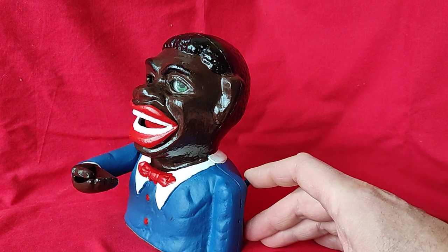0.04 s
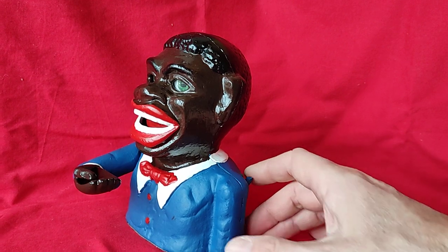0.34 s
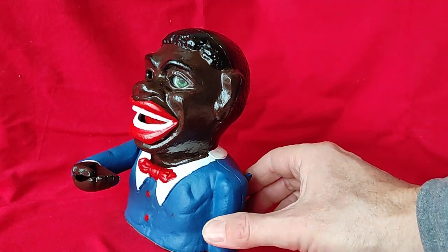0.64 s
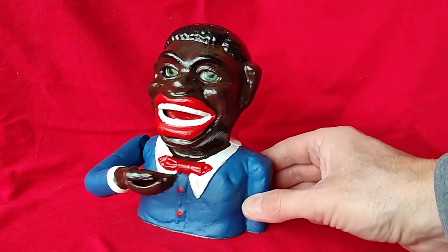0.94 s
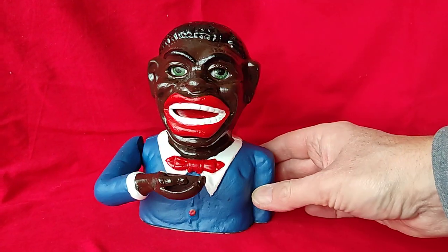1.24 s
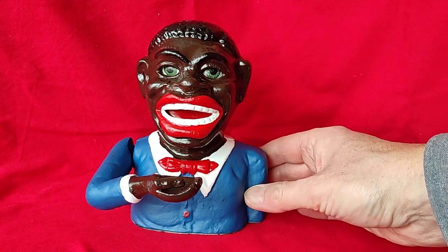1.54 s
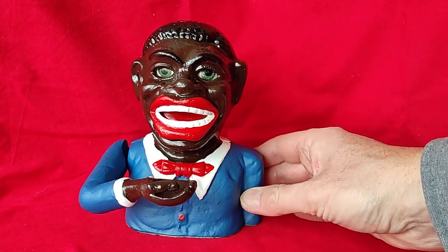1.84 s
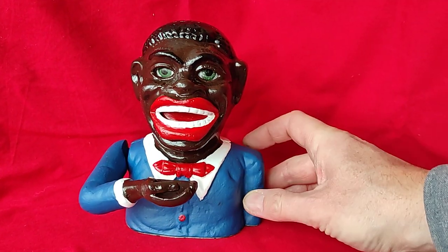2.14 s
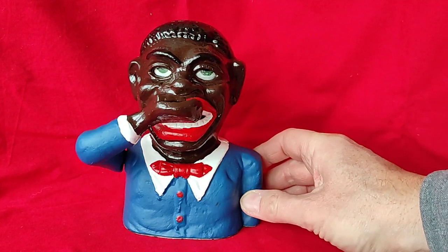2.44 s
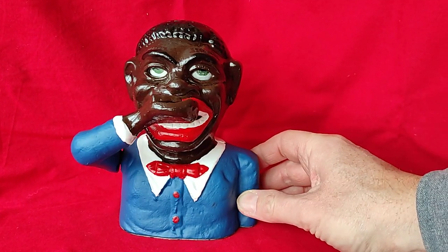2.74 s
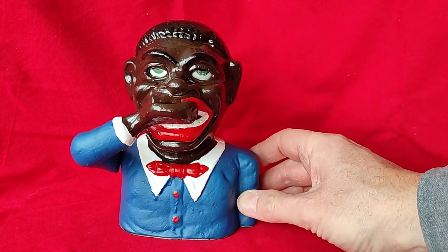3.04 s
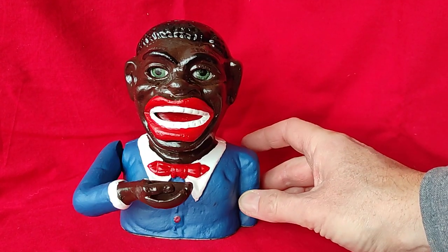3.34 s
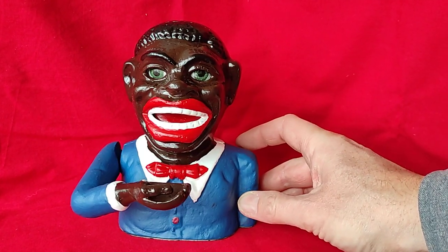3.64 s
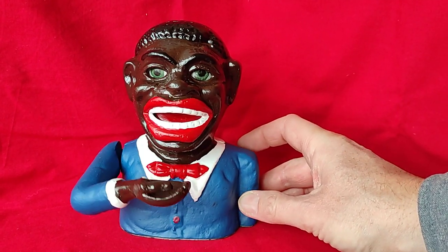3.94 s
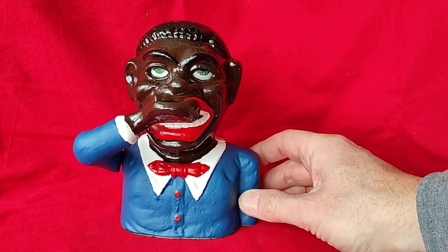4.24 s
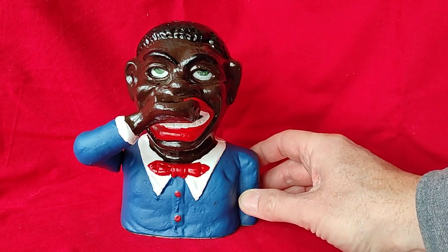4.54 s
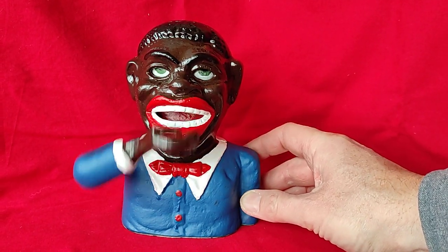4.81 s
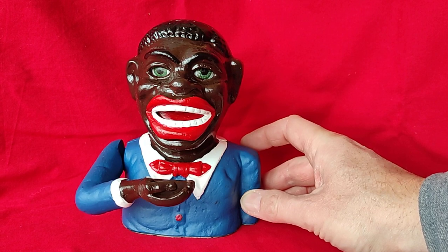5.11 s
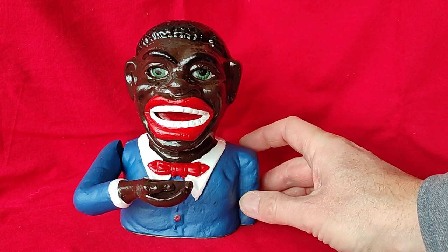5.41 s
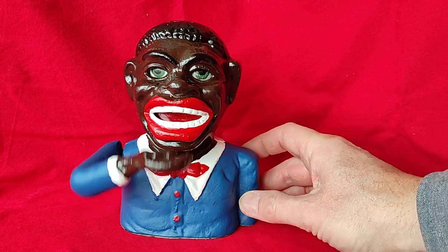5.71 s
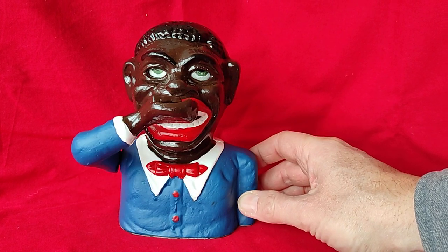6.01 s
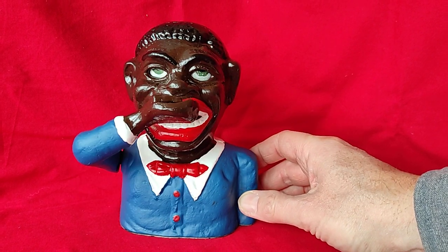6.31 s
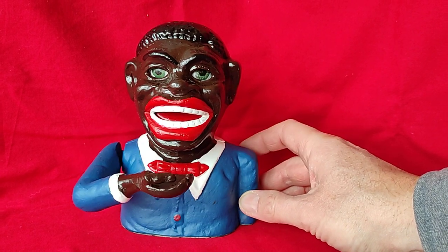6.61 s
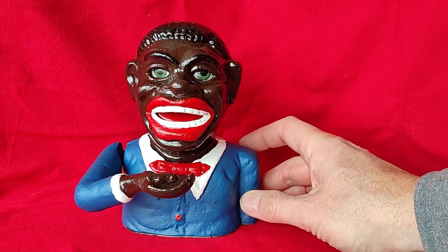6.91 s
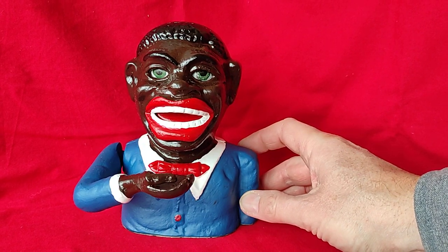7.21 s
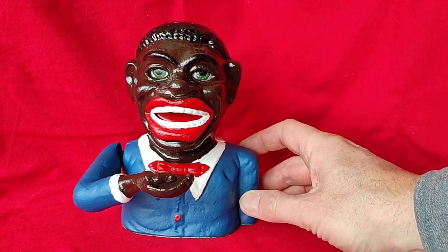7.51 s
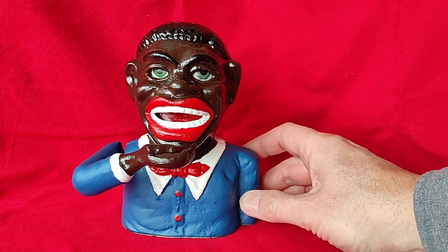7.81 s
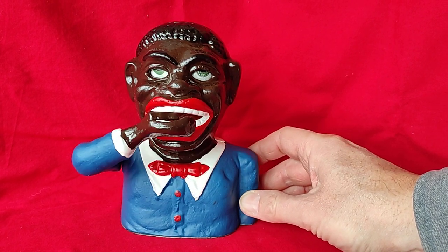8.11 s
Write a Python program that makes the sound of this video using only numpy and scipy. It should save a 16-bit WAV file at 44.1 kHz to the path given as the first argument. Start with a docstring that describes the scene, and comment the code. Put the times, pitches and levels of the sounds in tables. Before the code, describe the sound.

A cast-iron coin bank is handled close by in a small room with a steady low rumble. From about 0.3 to 1.4 seconds it slides faintly on a cloth-covered table with soft bumps and a hollow knock at 1.1 seconds. Its lever is then pressed and released three times, each press preceded by a light click. The arm rises with a sharp metallic clack at about 2.5, 4.2 and 5.9 seconds, and drops with a short scrape, a clack and tiny bounces at about 3.3, 5.0 and 6.6 seconds. Each impact rings briefly, and loose parts knock inside the hollow body. A distant motor hums faintly from around 3.5 seconds and swells once near 7 seconds. Light lever clicks at 7.7 seconds and a small, short creak at 8.1 seconds end the handling.

```python
"""Over the low rumble of a small room, a cast-iron coin bank slides and bumps on a cloth-covered table.
Close by, its lever is then pressed and let go three times: the linkage ticks, dry friction drives the
pivot, and the arm clacks against its stops, each impact exciting the modes of the casting.
Loose parts knock in the hollow inside; light clicks and a creak end the handling.
A distant motor hums faintly from midway and surges once."""
import sys
import numpy as np
from scipy import signal
from scipy.fft import rfft, irfft, next_fast_len
from scipy.io import wavfile
from scipy.ndimage import uniform_filter1d

SR = 44100
rng = np.random.default_rng(int(sys.argv[2]) if len(sys.argv) > 2 else 0)


def unload_wav(signal):
    """Save mono or channel-first audio to the path in sys.argv[1] as 16-bit WAV at rate SR, clipped to [-1, 1]."""
    wavfile.write(
        sys.argv[1],
        SR,
        np.round(np.clip(np.atleast_2d(signal).T, -1, 1) * 32767).astype(np.int16),
    )


N = 364260
TIME = np.arange(N) / SR
RING = np.arange(SR // 4) / SR  # seconds after a blow
ATTACK = round(.007 * SR)  # the first samples of a blow, which set its level
TOP_HZ = 15600


def amp(db):
    """Decibels to amplitude ratio."""
    return 10 ** (np.asarray(db) / 20)


def unit(x, n=None):
    """Normalisation to rms 1, over the first n samples if n is given."""
    return x / np.sqrt(np.mean(x[..., :n] ** 2) + 1e-20)


def along(points, hz):
    """Interpolation on a logarithmic frequency axis."""
    freqs, values = np.transpose(points)
    return np.interp(np.log(hz + 1), np.log(freqs + 1), values)


def filtered(x, response):
    """Linear filtering: the spectrum is multiplied by a frequency response."""
    n = x.shape[-1]
    size = next_fast_len(n + SR // 8)
    return irfft(rfft(x, size) * response(np.fft.rfftfreq(size, 1 / SR)), size)[..., :n]


def low_cut(x, hz):
    """A causal fourth-order high-pass."""
    return signal.sosfilt(signal.butter(4, hz, "high", fs=SR, output="sos"), x)


def noise(spectrum, n, alike):
    """Coloured stereo noise: mid and side mix to the correlation `alike`, a number or a curve."""
    def colour(hz):
        correlation = along(alike, hz) if np.ndim(alike) else alike + 0 * hz
        angle = np.arccos(np.clip(correlation, -1, 1)) / 2
        return amp(along(spectrum, hz)) * [np.cos(angle), np.sin(angle)]
    mid, side = filtered(rng.standard_normal((2, n)), colour)
    return unit(np.array([mid + side, mid - side]))


def fade(t60):
    """Exponential damping: 60 dB lost in t60 seconds."""
    return np.exp(-np.log(1000) * RING / t60)


def mode(hz, t60):
    """The free vibration of a damped oscillator."""
    return np.sin(2 * np.pi * hz * RING) * fade(t60)


def panned(side_db):
    """Amplitude panning: two gains of mean 1, the left side_db above the right."""
    gains = amp(side_db * np.array([[.5], [-.5]]))
    return gains / gains.mean(0)


def add(track, s, sound):
    """Superposition: a sound joins the track at s seconds."""
    start = round(s * SR)
    track[:, start:start + sound.shape[-1]] += sound[..., :N - start]


# Room noise. Each row: frequency in Hz, relative spectral density in dB.
ROOM_SPECTRUM = [(15, -67.5), (25, -46), (63, -2.5), (102, -4), (166, -1), (195, -3.5), (217, -11.5),
                 (285, -11), (317, -12), (354, -12), (677, -23), (962, -24.5), (7310, -43), (12200, -43),
                 (16000, -37.5)]
# Its balance. Each row: frequency in Hz, left over right in dB.
ROOM_BALANCE = [(60, 6.5), (180, 2.5), (550, -1.5), (1650, 0.5), (4970, 1.0), (15000, -0.5)]
# Its width. Each row: frequency in Hz, left-right correlation.
ROOM_CORRELATION = [(60, 0.46), (180, 0.78), (550, 0.36), (1650, -0.24), (4970, -0.11), (15000, -0.76)]

def room_rumble():
    """Stationary noise: a low rumble and faint hiss, partly correlated between left and right."""
    air = noise(ROOM_SPECTRUM, N, ROOM_CORRELATION)
    air = filtered(air, lambda hz: amp(along(ROOM_BALANCE, hz) * [[.5], [-.5]]))
    return amp(-54) * unit(air)


# Reverberation time. Each row: frequency in Hz, t60 in seconds.
WALL_DECAY = [(150, 0.47), (1000, 0.12), (5000, 0.21), (15000, 0.12)]

def reverberation(x):
    """Absorption at the walls varies with frequency: the bass outlasts the treble."""
    hz, t, spectra = signal.stft(rng.standard_normal((2, SR // 2)), SR, nperseg=256)
    decay = np.exp(-np.log(1000) * t / along(WALL_DECAY, hz)[:, None])
    tail = signal.istft(spectra * decay, SR, nperseg=256)[1]
    tail = np.pad(tail, ((0, 0), (SR // 200, 0)))  # reflections start 5 ms late
    return signal.fftconvolve(x, tail / np.linalg.norm(tail[0]), axes=1)[:, :N]


def motor():
    """Forced resonance: a far motor's octave drives a room mode. In a surge, speed lags effort."""
    idle_hz, surge_hz, lag_s = 177, 11, .199
    idle_db, surge_db = -65, 10.5
    on_s, fade_in_s = 3.4, .63
    mode_hz, width_hz, mode_db = 359.8, 13, 2.2
    surge_s = 6.68 + np.cumsum([0, .259, .42, 1.15])  # start, rise, hold, fall
    effort = lambda t: np.interp(t, surge_s, [0, 1, 1, 0])
    pitch = idle_hz + surge_hz * effort(TIME - lag_s)
    level = amp(idle_db + surge_db * effort(TIME)) * np.clip((TIME - on_s) / fade_in_s, 0, 1)
    octave = amp(mode_db) / np.hypot(1, 2 * (2 * pitch - mode_hz) / width_hz)
    phase = 2 * np.pi * np.cumsum(pitch) / SR
    return level * (np.sin(phase) + octave * np.sin(2 * phase))


# Iron on cloth. Each row: frequency in Hz, relative spectral density in dB.
CLOTH_SPECTRUM = [(350, -34), (600, -0.5), (1030, -4), (1800, -7.5), (1980, -11), (5870, -10.5),
                  (7110, -19.5), (12000, -8.5), (16000, -21)]
# Slides of the base. Each row: start in seconds, end in seconds, level in dB.
BASE_SLIDES = [(0.298, 0.61, -73), (0.875, 1.39, -63)]

def cloth_hiss():
    """Sliding friction on the weave makes a hiss that builds, sags and dies as the bank is turned."""
    rise, sag, stop = 118, 8.5, 75  # dB per second
    level = 0
    for start, end, db in BASE_SLIDES:
        before, since, after = np.maximum([start - TIME, TIME - start, TIME - end], 0)
        level = level + amp(db - rise * before - sag * since - stop * after)
    return level * noise(CLOTH_SPECTRUM, N, alike=.4)


def bump(db, hz, t60):
    """A cushioned impact: the cloth softens the blow to a few slow cycles of the table."""
    thud = mode(hz, t60) * (1 - np.exp(-(RING / .005) ** 2))
    return amp(db) * thud / np.abs(thud).max()


# Bumps of the base. Each row: start in seconds, peak in dB, pitch in Hz, t60 in seconds.
BASE_BUMPS = [(.579, -32.5, 132, .015), (.627, -32, 145, .019), (.900, -33, 125, 0.064),
              (1.937, -35.5, 103, 0.033), (3.544, -33.5, 117, 0.037), (4.560, -43, 78.5, 0.059)]

def table_bumps():
    """The base bumps the table; a level difference places the thuds on the left."""
    out = np.zeros((2, N))
    for s, db, hz, t60 in BASE_BUMPS:
        add(out, s, panned(side_db=23) * bump(db, hz, t60))
    return out


# Iron on iron. Each row: frequency in Hz, relative spectral density in dB.
CRACK_SPECTRUM = [(150, -48), (500, -19.5), (1000, 4), (1500, -5.5), (2100, -2.5), (2700, 3.5), (4400, 1.5),
                  (6500, 0.5), (7100, -5.5), (8600, -4.5), (11000, -5), (13500, -7.5), (15500, -13.5)]

def crack(alike, t60):
    """A brief contact has a broad spectrum: a burst of bright noise."""
    return noise(CRACK_SPECTRUM, len(RING), alike) * fade(t60)


# The hollow body. Each row: frequency in Hz, relative spectral density in dB.
BODY_SPECTRUM = [(60, -49.5), (120, -33), (230, -11), (325, 0.5), (420, -7), (550, 1.5), (650, -5.5),
                 (780, -9.5), (1200, -19), (2200, -26), (4000, -81.5)]

def shell(alike, t60):
    """Overlapping low resonances of the body answer a blow like decaying noise."""
    return noise(BODY_SPECTRUM, len(RING), alike) * fade(t60)


def spring(start_hz, end_hz, droop_s, t60):
    """Dispersion: high bending waves in the return spring arrive first, so the twang falls."""
    hz = end_hz + (start_hz - end_hz) / (1 + RING / droop_s)
    return np.sin(2 * np.pi * np.cumsum(hz) / SR) * fade(t60)


# Modes of the hollow inside. Each row: frequency in Hz, relative level in dB, t60 in seconds.
CAVITY_MODES = [(584, -11, 0.056), (643, -14, 0.077), (810.6, -4, .018), (933, 7.5, 0.012),
                (1090, -5.5, 0.012), (1335, -22.5, 0.033), (1760, -14.5, .06)]

def knock(db, hardness):
    """A blunt blow excites damped cavity modes; hardness tilts them upward, in dB per octave."""
    tuning = 1 + .032 * rng.standard_normal()
    ring = sum(amp(level + hardness * np.log2(hz)) * mode(hz * tuning, t60)
               for hz, level, t60 in CAVITY_MODES)
    ring = ring * (1 - np.exp(-(RING / .001) ** 2))
    snap = amp(hardness - 28.5) * crack(alike=.2, t60=.025)
    return amp(db - 2) * (ring / np.abs(ring).max() + snap)


# Modes of the lever. Each row: frequency in Hz, relative level in dB, t60 in seconds.
LEVER_MODES = [(2380, -5, .06), (2787, 2, .075), (3908, -9.5, 0.074), (4490, -6.5, .09), (4640, -6, .1),
               (6110, -9.5, 0.056)]

def lever():
    """Free vibration of the lever's few modes, which stand out in light contacts."""
    tuning = 1 + .006 * rng.standard_normal()
    return unit(sum(amp(db) * mode(hz * tuning, t60) for hz, db, t60 in LEVER_MODES), ATTACK)


# Strong modes of the casting. Each row: frequency in Hz, relative level in dB.
IRON_MODES = [(1775, -5), (2288, -10), (2790, -2), (3000, -3), (3280, 0), (3350, -4), (4145, -1),
              (4270, -4), (4394, 2), (4635, 1), (5425, -1), (5640, -3), (6450, 3), (6600, 2), (7730, -6),
              (8452, -1), (9980, -2), (10930, -2), (12580, -5)]
# Damping of the iron. Each row: frequency in Hz, t60 in seconds.
IRON_T60 = [(1500, 0.16), (3200, 0.098), (4600, .1), (6500, 0.073), (11000, 0.091), (15000, 0.1)]

def casting(weak_count):
    """Normal modes of the casting, one complex decay a row: a few strong among many weak."""
    strong_hz, strong_db = np.transpose(IRON_MODES)
    weak_hz = 1000 + (TOP_HZ - 1000) * (np.arange(weak_count) + rng.random(weak_count)) / weak_count
    hz = np.concatenate([strong_hz, weak_hz])[:, None]
    db = np.concatenate([strong_db, along(CRACK_SPECTRUM, weak_hz) - 9])[:, None]
    t60 = along(IRON_T60, hz) * np.exp(.15 * rng.standard_normal(hz.shape))
    return amp(db) * fade(t60) * np.exp(2j * np.pi * hz * RING)


def struck(modes, alike):
    """Modal superposition: each blow has new weights, left and right, and a slightly new pitch."""
    strength = amp(3 * rng.standard_normal(len(modes)))
    mid, side = strength * np.exp(2j * np.pi * rng.random((2, len(modes))))
    angle = np.arccos(np.clip(alike, 0, 1)) / 2
    weights = np.cos(angle) * mid + np.sin(angle) * np.array([side, -side])
    shift_hz = 18 * rng.standard_normal()
    ring = weights @ modes * np.exp(2j * np.pi * shift_hz * RING)
    return unit(ring.real, ATTACK)


def voiced(metal, treble_db, n):
    """Filtering sets a tick's brightness: duller ticks have less treble and are low-passed lower."""
    edge_hz = np.interp(treble_db, [-35, -18], [4400, 7200])
    low = signal.sosfilt(signal.butter(7, edge_hz, fs=SR, output="sos"), metal)
    high = signal.sosfilt(signal.butter(7, 7200, "high", fs=SR, output="sos"), metal)
    return unit(low, n) + amp(treble_db) * unit(high, n)


def clack(modes, db, treble_db, body_db, lever_db):
    """Impulse response of casting, lever, body and spring; the last three levels are relative to db."""
    snap = amp(3) * crack(alike=.07, t60=.012)
    metal = snap + struck(modes, alike=.075) + amp(lever_db) * lever()
    metal = voiced(metal, treble_db, ATTACK)
    twang = amp(-3.5) * spring(start_hz=1293, end_hz=276, droop_s=.0022, t60=.13)
    body = shell(alike=.67, t60=.12) + twang
    body = body * (1 - np.exp(-RING / .0004))  # the heavy shell takes a moment to move
    return low_cut(amp(db + 1) * metal + amp(db + body_db) * unit(body, ATTACK), hz=149)


# Resonances of the dry pivot. Each row: frequency in Hz, bandwidth in Hz, relative level in dB.
PIVOT_MODES = [(1515, 44, -5), (2767, 51, 0), (2960, 42, 0.5), (4270, 120, -8), (6430, 120, -16.5)]

def rub(modes, length_s, db, treble_db, body_db, chatter_db):
    """Dry friction: tiny random slips keep casting, body and pivot ringing while the arm moves."""
    slips_per_s = 700
    pivot = sum(amp(level) * width * np.exp(-np.pi * width * RING) * np.sin(2 * np.pi * hz * RING)
                for hz, width, level in PIVOT_MODES)
    n = round(length_s * SR)
    strengths = rng.standard_normal((1, len(RING)))[:, :n]
    slips = strengths * (rng.random(len(RING))[:n] < slips_per_s / SR)
    rubbed = lambda response: unit(signal.fftconvolve(slips, response, axes=1), n)
    metal = rubbed(struck(modes, alike=.2) * fade(.087))  # the pressed contact damps the ring
    body = amp(body_db) * rubbed(shell(alike=.8, t60=.036))
    chatter = amp(chatter_db) * rubbed(pivot[None])
    return low_cut(amp(db - 3.5) * (voiced(metal, treble_db, n) + body + chatter), hz=150)


def groan(length_s, db, start_hz, end_hz, rough):
    """Stick-slip oscillation: the loaded pivot slips almost regularly, in a low tone that swells."""
    progress = np.clip(RING / length_s, 0, 1)
    jitter = unit(uniform_filter1d(rng.standard_normal(len(RING)), size=200))
    hz = (start_hz + (end_hz - start_hz) * progress) * (1 + rough * jitter)
    phase = 2 * np.pi * np.cumsum(hz) / SR
    swell = np.sqrt(np.abs(np.sin(np.pi * progress)))
    return amp(db) * swell * (np.sin(phase) + amp(-19) * np.sin(2 * phase))


# Lever clicks. Each row: start in seconds, ring level in dB, treble and body in dB over the ring.
LEVER_CLICKS = [(2.2947, -43.5, -5, 2), (4.0563, -41.5, 3, 0), (5.6472, -46, -4.5, -1.5),
                (7.6984, -45.5, 5, 1.5), (7.728, -50, -11.5, 5.5), (7.844, -60, -24, 8)]
# Jogs of the casting. Each row: start in seconds, ring level in dB, treble and body in dB over the ring.
CASTING_JOGS = [(0.542, -65, -1, -19), (1.1488, -63.5, 6.5, 22), (4.575, -75, -36, 15),
                (8.0793, -68.5, 3.5, 18)]
# Loose parts. Each row: start in seconds, level in dB, hardness in dB per octave.
STRAY_KNOCKS = [(1.1478, -24, 7.5), (2.4404, -25, -3.5)]

def handling(modes):
    """Weak excitation: fingers click the lever and jog the casting; a last, slow lift creaks."""
    out = np.zeros((2, N))
    for s, db, treble_db, body_db in LEVER_CLICKS:
        add(out, s, clack(modes, db, treble_db, body_db, lever_db=1))
    for s, db, treble_db, body_db in CASTING_JOGS:
        add(out, s, clack(modes, db, treble_db, body_db, lever_db=-14))
    for s, db, hardness in STRAY_KNOCKS:
        add(out, s, knock(db, hardness))
    creak = groan(length_s=.069, db=-44.5, start_hz=383.7, end_hz=383.7, rough=.05)
    add(out, 8.105, creak + knock(db=-48, hardness=-4))
    return out


# Contacts in a lift. Each gives: ring level in dB, then treble, body and lever in dB over the ring.
SLACK = (-48.5, -45, 5.5, -1.5)
CATCH = (-38, -.5, -2.5, -7)
TOP_STOP = (-23.5, -9.5, -4.5, -11)
REBOUND = (-36, -3.5, -6.5, -9.5)
SETTLE = (-57.5, -5.5, 2.5, -1)
# Lever presses. Each row: times in seconds of slack taken up, catch, top stop and loose parts landing,
# then force in dB, landing level in dB, landing hardness in dB per octave.
ARM_LIFTS = [(2.3875, 2.4128, 2.4808, 2.497, -.5, -10, 0), (4.105, 4.134, 4.2066, 4.2207, 0, -8.5, -.5),
             (5.7759, 5.798, 5.8668, 5.8797, 1, -5.5, 2.5)]

def lifts(modes):
    """Friction, then impact: the arm rubs up to its stop and rebounds; loose parts land twice."""
    out = np.zeros((2, N))
    for slack_s, catch_s, stop_s, land_s, force_db, land_db, hardness in ARM_LIFTS:
        contacts = [(slack_s, SLACK), (catch_s, CATCH), (stop_s, TOP_STOP),
                    (stop_s + .026, REBOUND), (stop_s + .124, SETTLE)]
        for s, contact in contacts:
            add(out, s, amp(force_db) * clack(modes, *contact))
        swing_s = stop_s - catch_s
        friction = rub(modes, swing_s, db=-46.5, treble_db=-4.5, body_db=6, chatter_db=-8)
        add(out, catch_s, amp(force_db) * friction)
        groan_s = swing_s / 2 + .015
        add(out, stop_s - groan_s, groan(groan_s, force_db - 38.5, start_hz=370, end_hz=288, rough=.06))
        add(out, land_s, knock(land_db, hardness))
        add(out, land_s + .0085, knock(db=-17.5, hardness=-2))
    return out


# Contacts in a fall. Each gives: ring level in dB, then treble, body and lever in dB over the ring.
RELEASE = (-57, -1, 8, -5.5)
SCRAPE_TICK = (-42, -13, -6.5, -1)
GUIDE_TICK = (-41.5, -8, -.5, -6.5)
BOTTOM_STOP = (-23, -4.5, -4, -17)
# Lever releases. Each row: release and landing in seconds, grinding level in dB, landing force in dB,
# first flight in seconds, first bounce level in dB.
ARM_FALLS = [(3.177, 3.2661, -49, 2, .03, -32), (4.859, 4.95, -47.5, 0, .02, -39),
             (6.526, 6.619, -38, -10, .012, -40)]

def falls(modes):
    """Inelastic collision: the arm scrapes down, lands and bounces twice, sooner and softer each time."""
    linkage_lag_s, flight_ratio, bounce_loss_db = .009, .56, 6
    out = np.zeros((2, N))
    for release_s, land_s, grind_db, force_db, flight_s, bounce_db in ARM_FALLS:
        scrape = rub(modes, land_s - release_s, db=-55, treble_db=-10, body_db=4.5, chatter_db=9.5)
        add(out, release_s, scrape)
        ticks = [(release_s, RELEASE), (release_s + .042, SCRAPE_TICK), (land_s - .022, GUIDE_TICK)]
        for s, contact in ticks:
            add(out, s, amp(force_db / 2) * clack(modes, *contact))
        add(out, land_s - .027, knock(db=-24.5, hardness=-3))  # loose parts shift
        grind = rub(modes, 2 * linkage_lag_s, grind_db, treble_db=-3, body_db=4.5, chatter_db=-2.5)
        add(out, land_s - linkage_lag_s, grind)
        add(out, land_s, amp(force_db) * clack(modes, *BOTTOM_STOP))
        # linkage and loose parts follow: a gentler landing rings less but thumps the same
        linkage = clack(modes, -28 + force_db / 2, treble_db=-1.5,
                        body_db=.5 - force_db / 2, lever_db=-12.5)
        add(out, land_s + linkage_lag_s, linkage + knock(db=-16, hardness=2.5))
        add(out, land_s + .008, bump(db=-34.5 + .71 * force_db, hz=131.7, t60=.22))  # the table gives
        for k in range(2):
            s = land_s + flight_s * (1 + k * flight_ratio)
            db = bounce_db - k * bounce_loss_db
            add(out, s, clack(modes, db, treble_db=-.5, body_db=-2.5, lever_db=-10))
    return out


# Balance of the bank. Each row: frequency in Hz, left over right in dB.
BANK_BALANCE = [(150, 2), (400, -4), (1300, -0.5), (2400, -7), (4400, -8), (6500, -13.5), (8500, -21),
                (12000, -13.5), (15000, -13.5)]

def scene():
    """Superposition: the bank and its reverberation, treble to the right, over table, motor and room."""
    modes = casting(weak_count=170)
    bank = lifts(modes) + falls(modes) + handling(modes) + cloth_hiss()
    bank = bank + amp(-19) * reverberation(bank)
    bank = filtered(bank, lambda hz: panned(along(BANK_BALANCE, hz)))
    return bank + table_bumps() + motor() + room_rumble()


def record(dry):
    """Band limiting removes the deepest rumble and the highest treble."""
    return filtered(low_cut(dry, hz=46.28), lambda hz: hz < TOP_HZ)


dry = scene()
out = record(dry)
unload_wav(out)
```